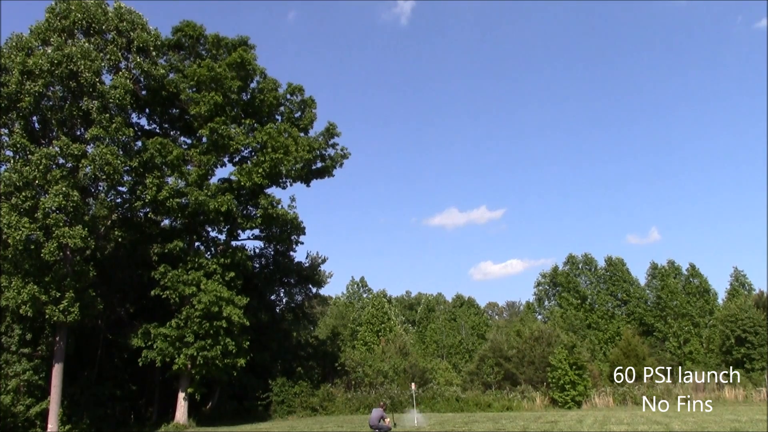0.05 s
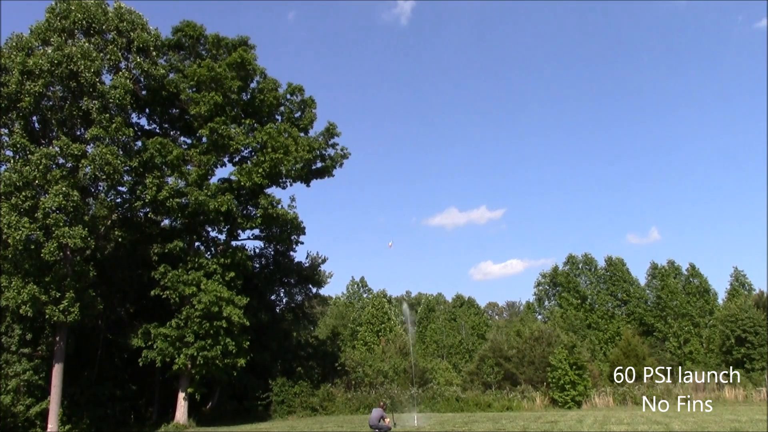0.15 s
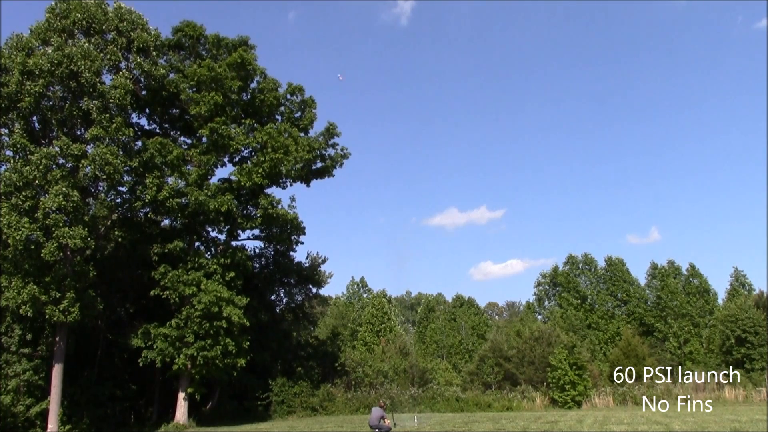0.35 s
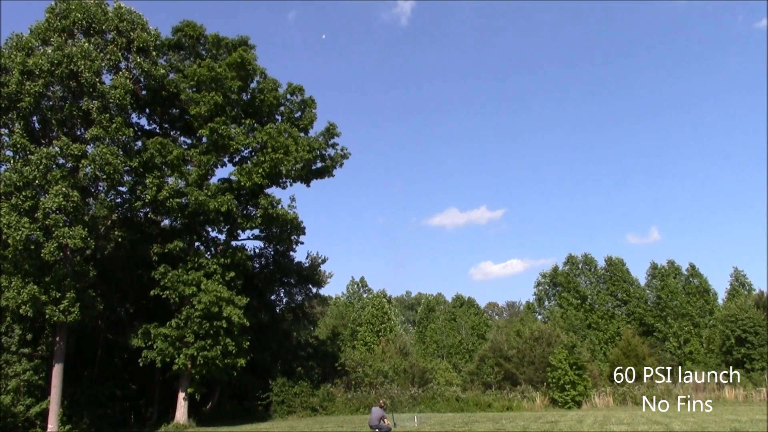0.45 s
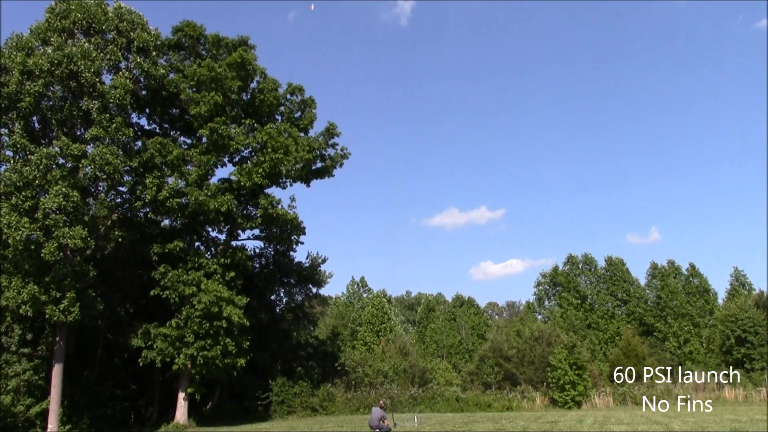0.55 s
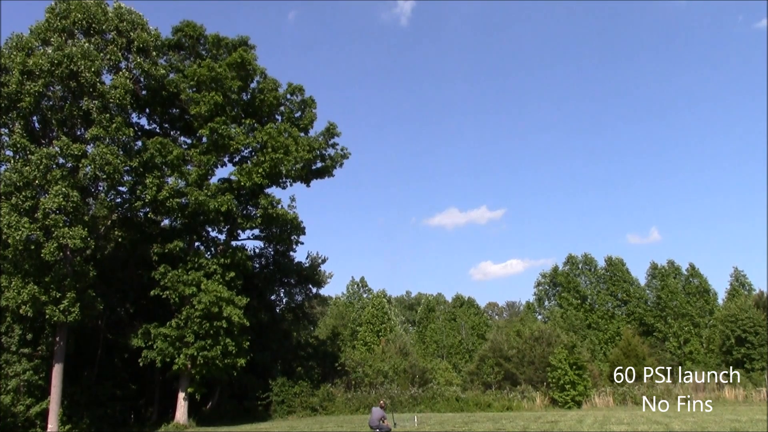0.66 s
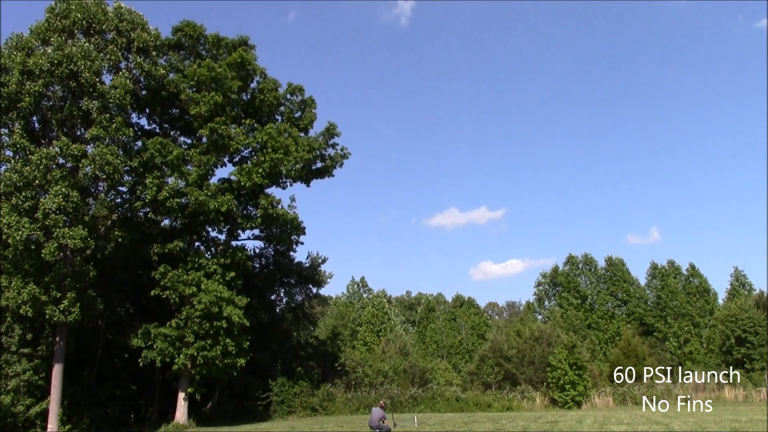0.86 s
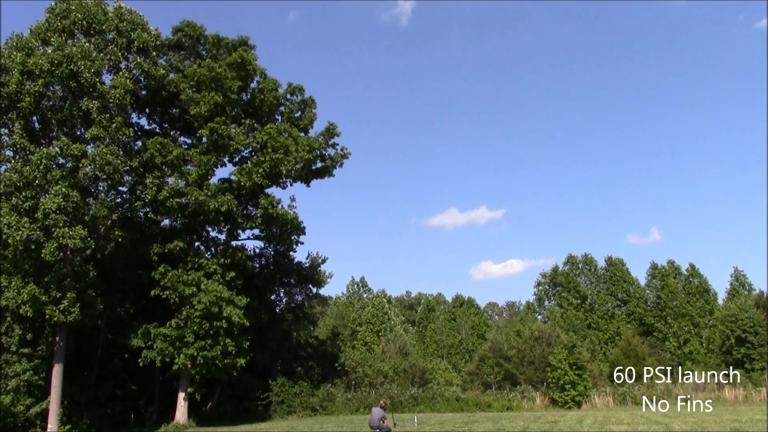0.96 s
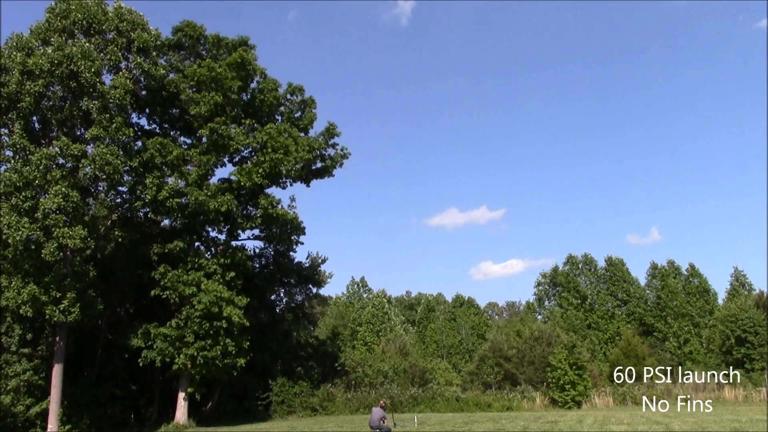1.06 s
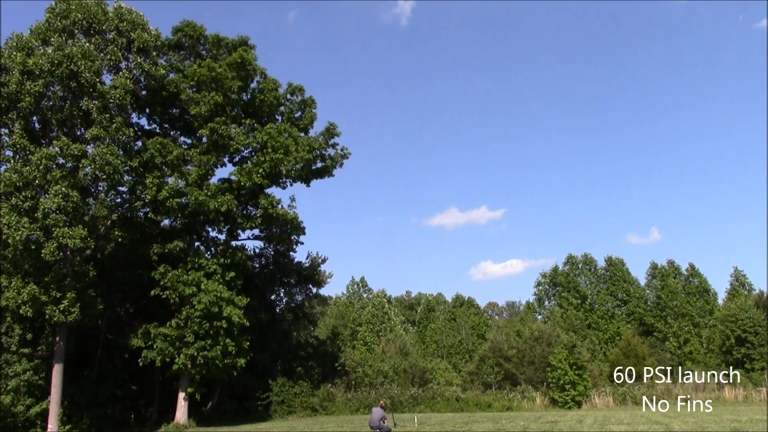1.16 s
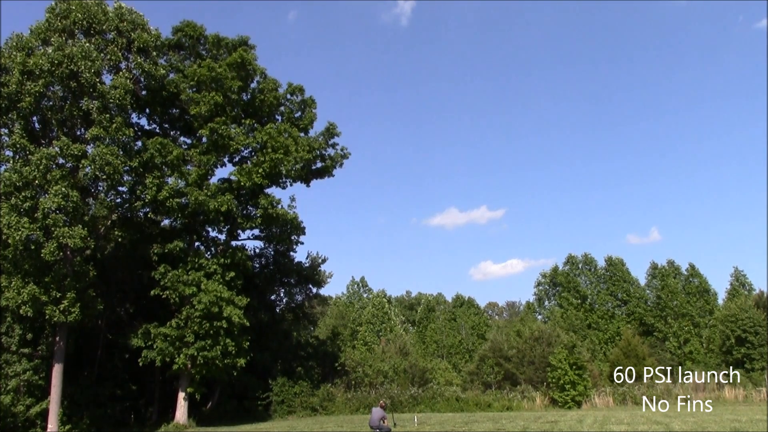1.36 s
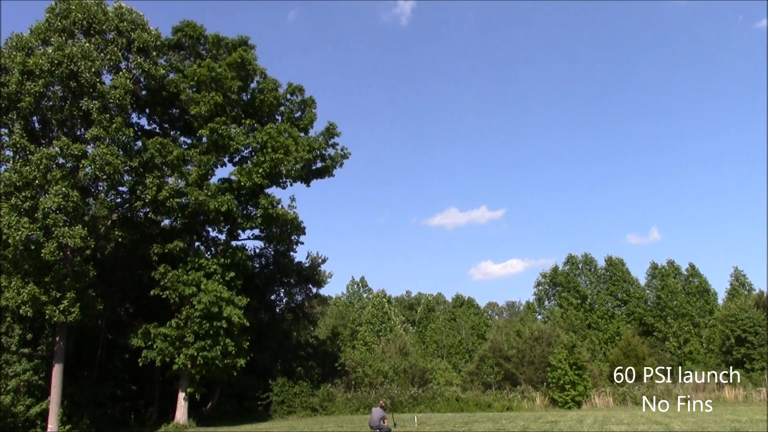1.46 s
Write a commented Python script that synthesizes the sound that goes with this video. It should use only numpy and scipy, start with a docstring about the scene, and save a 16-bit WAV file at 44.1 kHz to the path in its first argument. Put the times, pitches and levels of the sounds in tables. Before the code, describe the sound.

A water rocket launches from a lawn over a faint rush of leaves. At about 0.2 seconds a latch clicks and scrapes, then the bottle pops sharply free and water hisses out. Just after 0.3 seconds the remaining air bursts out in a short, hollow whoosh. Fine spray patters down until about 0.7 seconds, and a soft echo from the trees fades by one second, leaving the light outdoor rush.

```python
"""A light outdoor rush, then a latch clicks and scrapes: a water rocket leaves its launcher on a lawn.
The bottle pops free and rings, water hisses from the nozzle, then the remaining air bursts out
and fades while spray patters down.
A nearby surface returns a dull slap, the surrounding trees a soft tail."""
import sys
import numpy as np
from scipy import signal
from scipy.fft import rfft, irfft
from scipy.io import wavfile
from scipy.ndimage import uniform_filter1d

SR = 44100
rng = np.random.default_rng(int(sys.argv[2]) if len(sys.argv) > 2 else 0)


def put_to_file(sound):
    """Save the sound as 16-bit audio at rate SR, in the file named by the first command-line argument."""
    columns = np.atleast_2d(sound).T  # one column per channel
    safe = np.clip(columns, -1, 1)
    whole_steps = np.round(safe * 32767)
    wavfile.write(sys.argv[1], SR, whole_steps.astype(np.int16))


N = 66150


def undb(db):
    return 10 ** (np.asarray(db) / 20)


def unit(x):
    return x / np.sqrt(np.mean(x ** 2))


def clock():
    return np.arange(N) / SR


def colour(x, points):
    """Minimum-phase filter through (frequency [Hz], gain [dB]) points."""
    hz, db = np.array(points, float).T
    bins_hz = np.maximum(np.arange(N + 1) * SR / (2 * N), 1)
    gain = undb(np.interp(np.log(bins_hz), np.log(hz), db))
    cepstrum = irfft(np.log(gain))
    cepstrum[1:N] *= 2
    cepstrum[N + 1:] = 0
    return irfft(rfft(x, 2 * N) * np.exp(rfft(cepstrum)))[:N]


def noise(points):
    """Coloured noise, rms 1."""
    return unit(colour(rng.standard_normal(N), points))


def lowpass(x, hz):
    return signal.sosfiltfilt(signal.butter(2, hz, fs=SR, output="sos"), x)


def walk(rate_hz):
    """Smooth random wander, rms 1."""
    step = max(int(SR / rate_hz), 1)
    stairs = np.repeat(rng.standard_normal(N)[:N // step + 1], step)
    return unit(uniform_filter1d(stairs, step)[:N])


def envelope(start_s, rise_s, hold_s, t60_s):
    """Linear attack, hold, exponential release."""
    age = clock() - start_s
    release = np.exp(-np.log(1000) * np.maximum(age - rise_s - hold_s, 0) / t60_s)
    return np.clip(age / rise_s, 0, 1) * release


def ring(start_s, hz, t60_s):
    """One struck mode."""
    age = np.maximum(clock() - start_s, 0)
    return np.sin(2 * np.pi * hz * age) * np.exp(-np.log(1000) * age / t60_s)


def bump(at_s, sigma_s):
    """Gaussian pulse, peak 1."""
    return np.exp(-.5 * ((clock() - at_s) / sigma_s) ** 2)


def outdoors():
    """Soft rush of leaves and distance; the bass wavers."""
    # rush spectrum (frequency [Hz], gain [dB])
    rush_colour = [(15, -58), (25, -29), (48, -16.5), (108, -1), (206, -3), (270, -3), (439, -5.5),
                   (695, -9.5), (754, -8), (936, -12.5), (1020, -10.5), (1190, -13), (1480, -12),
                   (1840, -16.5), (5570, -24), (11300, -32), (16000, -42)]
    # rush contour (time [s], level [dB])
    contour = [(0, -46), (.16, -46.5), (.8, -48.5), (1.1, -48.5), (1.5, -47.5)]
    flicker_db = 1.0
    rush = noise(rush_colour)
    bass = lowpass(rush, hz=500)
    wavering = bass * undb(flicker_db * walk(rate_hz=17.8))
    level_db = np.interp(clock(), *np.array(contour).T)
    return (rush - bass + wavering) * undb(level_db)


def latch(release_s):
    """The catch clicks, rings faintly and scrapes along the neck until the bottle is free."""
    # clicks (time [s], level [dB])
    hits = [(0.1809, -31), (0.184, -36.5), (0.1901, -32)]
    # click and scrape spectrum (frequency [Hz], gain [dB])
    latch_colour = [(200, -1), (900, -6), (1700, -3), (3000, -4), (4600, -8.5), (6000, 2), (8300, -5.5),
                    (10000, -23), (16000, -32)]
    # latch modes (frequency [Hz], level re click [dB], t60 [s])
    modes = [(1670, -4, 0.029), (2436, -10, 0.17), (6250, -16, .02)]
    first_s = hits[0][0]
    clicks = sum(undb(db) * envelope(s, rise_s=0.00025, hold_s=0, t60_s=0.02) for s, db in hits)
    scrape = undb(-50.5) * envelope(first_s, rise_s=0.0018, hold_s=release_s - first_s, t60_s=0.02)
    rings = sum(undb(db + mode_db) * ring(s, hz, t60) for s, db in hits for hz, mode_db, t60 in modes)
    return np.hypot(clicks, scrape) * noise(latch_colour) + rings


def slap(x, delay_s=0.01855):
    """One dull reflection from a nearby surface."""
    # surface response (frequency [Hz], gain [dB])
    surface = [(50, -7.5), (300, 2), (800, -0.5), (1500, -5), (3000, -9), (6000, -11.5), (10000, -29),
               (16000, -26)]
    delayed = np.interp(clock() - delay_s, clock(), x, left=0)
    return undb(-2) * colour(delayed, surface)


def pop(start_s):
    """The seal lets go: pressure spike, bright crack, short puff; the bottle rings."""
    # crack spectrum (frequency [Hz], gain [dB])
    crack_colour = [(500, -18), (3000, -9), (3700, -5), (4500, -22), (5600, -6), (7000, 1), (9500, 2),
                    (11000, -8), (13500, -18), (16000, -26)]
    # puff spectrum (frequency [Hz], gain [dB])
    puff_colour = [(100, -15), (900, -16.5), (1500, -0.5), (2200, -1), (3700, 3), (4200, -17), (4800, -6),
                   (5500, 0), (7500, 3.5), (9800, -2), (12000, -19.5), (16000, -30)]
    # bottle and launch tube modes (frequency [Hz], level [dB], t60 [s])
    modes = [(131, -21, 0.055), (229, -22, 0.045), (282, -12.5, 0.038), (397, -14.5, 0.039),
             (787, -18, 0.021), (1106, -21, 0.04), (1393, -18.5, 0.03), (1853, -10.5, 0.014),
             (2310, -20, 0.069), (2768, -17.5, 0.046), (5900, -21, 0.013)]
    sigma_s = 0.00011
    spike = -undb(-3) * bump(start_s + sigma_s, sigma_s)
    open_s = start_s + 2 * sigma_s
    crack = undb(-9) * envelope(open_s, rise_s=0.00005, hold_s=0, t60_s=0.0028) * noise(crack_colour)
    puff = undb(-12.5) * envelope(open_s, rise_s=0.0001, hold_s=0.0033, t60_s=0.014) * noise(puff_colour)
    rings = sum(undb(db) * ring(open_s, hz, t60) for hz, db, t60 in modes)
    return spike + crack + puff + rings


def jet():
    """Water sputters through the nozzle until the air breaks through."""
    # jet contour (time [s], level [dB])
    contour = [(.229, -27), (0.248, -30), (0.251, -19), (0.275, -25.5), (.279, -37.5), (0.286, -35),
               (.293, -26.5), (.308, -31), (0.323, -33)]
    # jet spectrum (frequency [Hz], gain [dB])
    jet_colour = [(50, -14), (150, 7.5), (300, -3.5), (600, -4), (1200, 0), (2000, 1.5), (3300, 4),
                  (4800, -3.5), (6500, -0.5), (9000, -4), (12000, -15.5), (16000, -30)]
    sputter_db = 1
    times_s, db = np.array(contour).T
    flowing = envelope(times_s[0], rise_s=0.0028, hold_s=times_s[-1] - times_s[0], t60_s=0.02)
    level_db = np.interp(clock(), times_s, db) + sputter_db * walk(rate_hz=600)
    return flowing * undb(level_db) * noise(jet_colour)


def trees(x):
    """Trunks and leaves scatter the sound back; the treble dies first."""
    # echo spectrum (frequency [Hz], gain [dB])
    echo_colour = [(50, -10), (150, -7), (300, -0.5), (700, -3.5), (1500, -0.5), (3200, -0.5), (5000, 0),
                   (8000, -7.5), (16000, 0)]
    delay_s, rise_s = 0.05, 0.071
    scatter = rng.standard_normal(N)
    low = lowpass(scatter, hz=4000)
    tail = low * envelope(delay_s, rise_s, hold_s=0, t60_s=1.27)
    tail += (scatter - low) * envelope(delay_s, rise_s, hold_s=0, t60_s=0.9)
    response = colour(tail / np.linalg.norm(tail), echo_colour)
    return undb(-17) * signal.fftconvolve(x, response)[:N]


def burst():
    """Air spits out the last water with a thump and a roar, brightens to a hiss and runs down."""
    # roar of escaping air (frequency [Hz], gain [dB])
    roar_colour = [(40, -17), (140, 2.5), (270, -11.5), (560, -0.5), (1100, -0.5), (1700, 1.5),
                   (2600, -2.5), (3600, 0), (4700, -16), (9000, -20), (16000, -38)]
    # hiss of air and fine spray (frequency [Hz], gain [dB])
    hiss_colour = [(500, -12), (3000, -9), (4800, -4.5), (6500, 5.5), (8500, -1.5), (11000, -8),
                   (13500, -15), (16000, -26)]
    # dying flow from the climbing bottle (frequency [Hz], gain [dB])
    exhaust_colour = [(40, -22), (110, -8), (210, -6.5), (320, 2.5), (480, -4.5), (800, 2.5), (1600, -4.5),
                      (3000, -2.5), (5000, -10.5), (8000, -10.5), (11000, -16), (16000, -38)]
    # water slugs (time [s], level [dB], sigma [s])
    slugs = [(0.3256, -13.5, 0.00016), (0.3303, -8.5, 0.0002), (.3324, -4, 0.000035)]
    thump = undb(-21.5) * ring(0.327, hz=128, t60_s=0.06)
    roar = undb(-15) * envelope(0.3205, rise_s=0.0068, hold_s=0.0044, t60_s=0.092) * noise(roar_colour)
    hiss = undb(-17.5) * envelope(0.3265, rise_s=0.0052, hold_s=0.0017, t60_s=0.04) * noise(hiss_colour)
    exhaust = undb(-27.5) * envelope(0.337, rise_s=0.015, hold_s=0.026, t60_s=0.4) * noise(exhaust_colour)
    spits = sum(undb(db) * bump(s, sigma) for s, db, sigma in slugs)
    return thump + hollow(roar + exhaust) + hiss + spits


def hollow(x):
    """Rushing air picks up the resonances of the emptying bottle."""
    # cavity resonances (frequency [Hz], bandwidth [Hz], gain [dB])
    resonances = [(329, 26, 3.5), (554.3, 24, 6), (718, 49, 1), (908, 38, -2.5), (1383, 63, -3.5),
                  (1600, 86, -0.5), (1726, 75, -5.5), (3470, 170, -6.5)]
    return x + sum(undb(db) * signal.lfilter(*signal.iirpeak(hz, hz / width_hz, fs=SR), x)
                   for hz, width_hz, db in resonances)


def spray():
    """Showers of fine, uneven droplets hit the pad and the grass."""
    # showers (time [s], level [dB], sigma [s])
    showers = [(.365, -27.5, 0.011), (0.403, -27, 0.0063), (0.423, -35.5, 0.0086), (.472, -40.5, 0.016),
               (0.5329, -37.5, 0.00072), (0.536, -42, 0.014), (.598, -50.5, .004), (.66, -55.5, 0.015)]
    # droplet spectrum (frequency [Hz], gain [dB])
    drop_colour = [(500, -10), (2800, 3), (5000, -4), (8300, -1), (10500, -3), (13000, -14.5), (16000, -31)]
    drops_per_s, scatter_db = 12000, 3.5
    sizes = undb(scatter_db * np.minimum(rng.exponential(size=N), 5))
    drops = rng.standard_normal(N) * sizes * (rng.random(N) < drops_per_s / SR)
    level = sum(undb(db) * bump(s, sigma) for s, db, sigma in showers)
    return unit(colour(drops, drop_colour)) * level


def scene():
    """Launch straight ahead; trees and outdoor rush wider."""
    # launch stereo width (frequency [Hz], side gain [dB])
    launch_width = [(60, -52), (300, -53), (1200, -62), (2800, -26), (6000, -18.5), (9000, -18.5),
                    (13000, -33)]
    # rush stereo width (frequency [Hz], side gain [dB])
    rush_width = [(60, -9), (110, -18.5), (200, -8.5), (380, -7), (700, -5), (1290, -9), (2380, -6.5),
                  (4400, -8.5), (8120, -9), (15000, -10)]
    release_s, low_cut_hz = 0.2253, 80
    low_cut = signal.butter(3, low_cut_hz, "high", fs=SR, output="sos")  # small nozzle: little bass
    launch = signal.sosfilt(low_cut, latch(release_s) + pop(release_s) + jet() + burst())
    mid = launch + slap(launch) + trees(launch) + spray()
    scatter = rng.standard_normal(N) * envelope(0, rise_s=0.00059, hold_s=0, t60_s=0.041)
    side_response = colour(scatter / np.linalg.norm(scatter), launch_width)
    spread = signal.fftconvolve(mid, side_response)[:N]
    side = spread + undb(-18) * trees(launch) + colour(outdoors(), rush_width)
    return mid + outdoors() + side * np.array([[1], [-1]])


def record(dry):
    """The microphone clips the loudest peaks and cuts the top."""
    clip_level, top_hz = 0.88, 15800
    top_cut = signal.ellip(8, .2, 70, top_hz, fs=SR, output="sos")
    return signal.sosfilt(top_cut, np.clip(dry, -clip_level, clip_level))


dry = scene()
out = record(dry)
put_to_file(out)
```